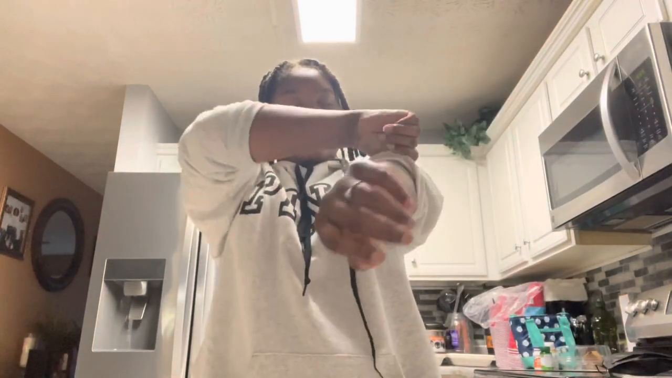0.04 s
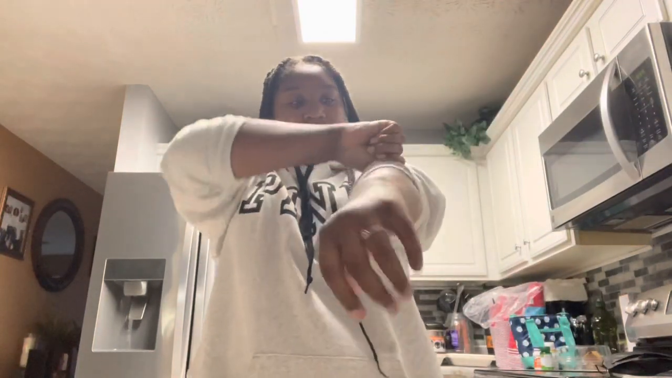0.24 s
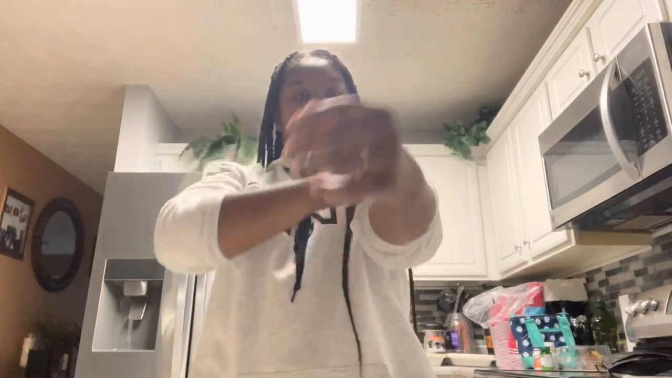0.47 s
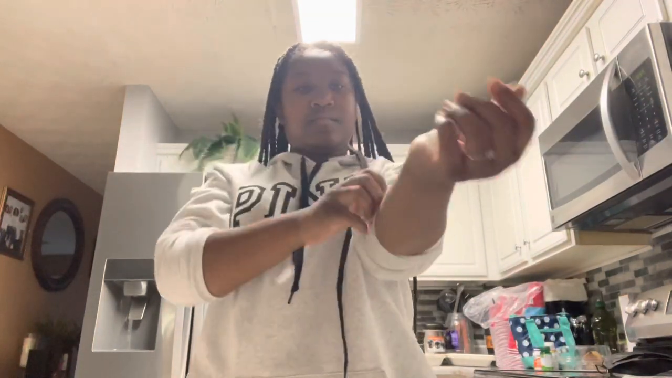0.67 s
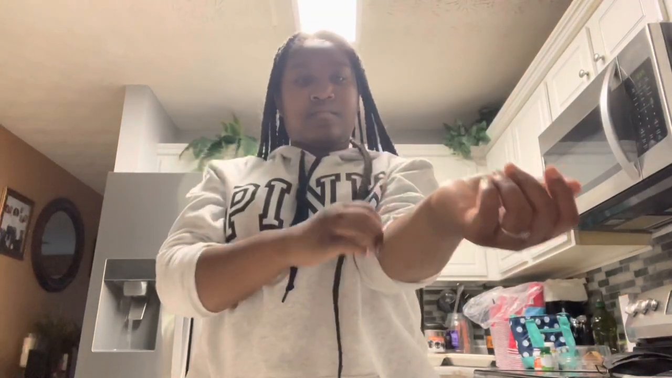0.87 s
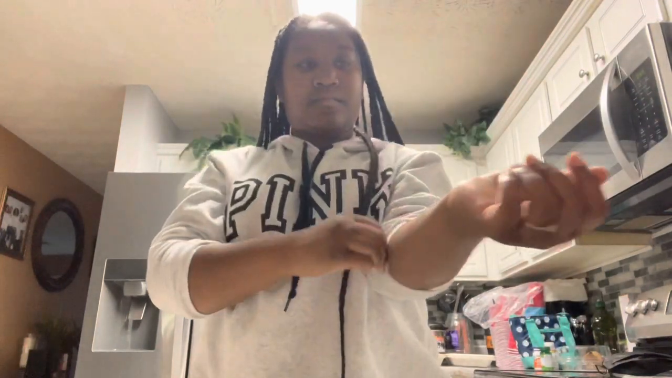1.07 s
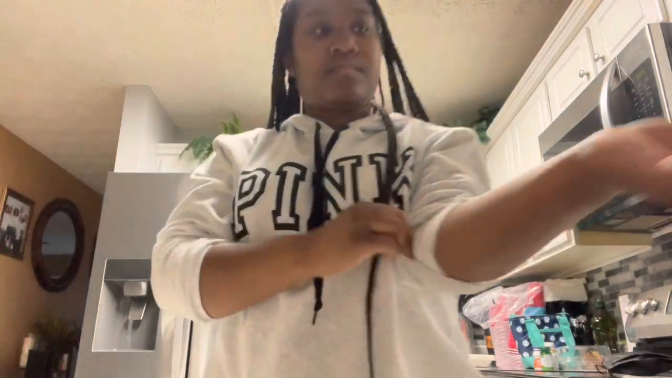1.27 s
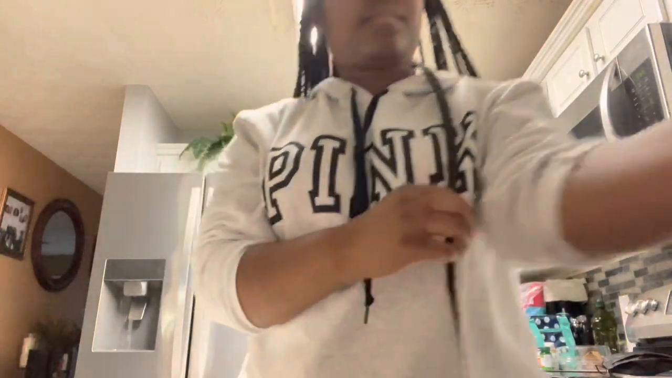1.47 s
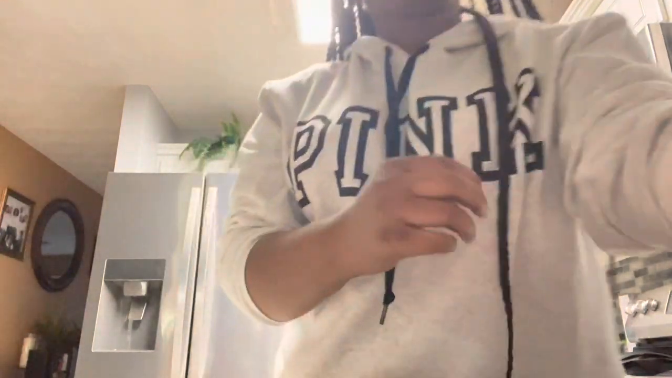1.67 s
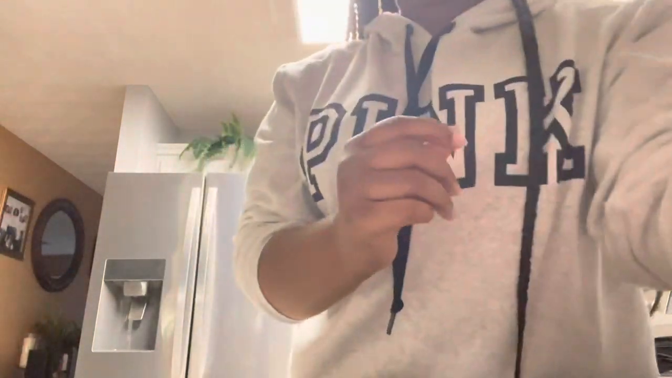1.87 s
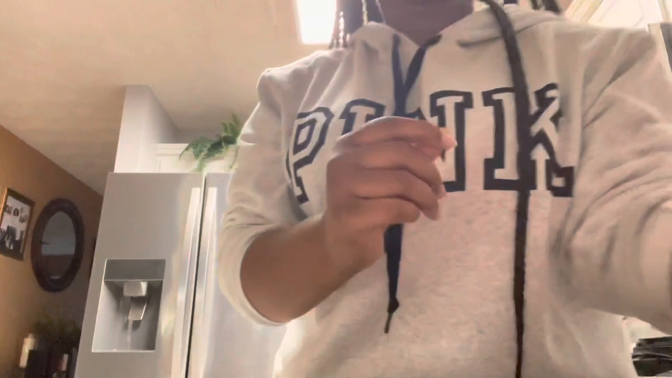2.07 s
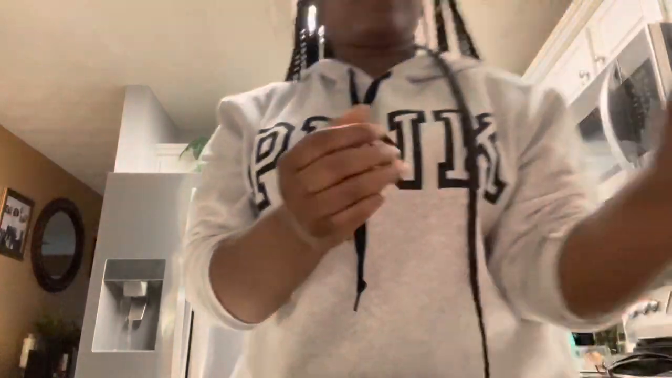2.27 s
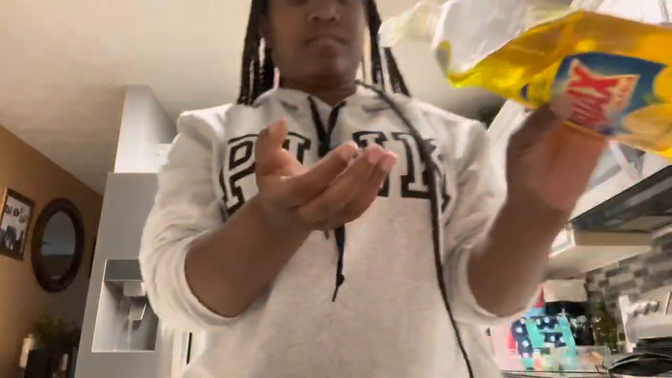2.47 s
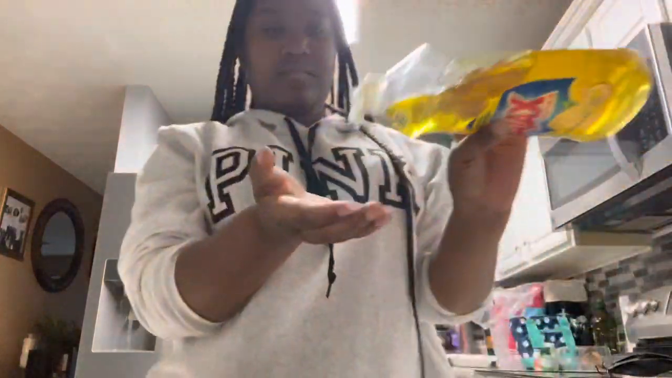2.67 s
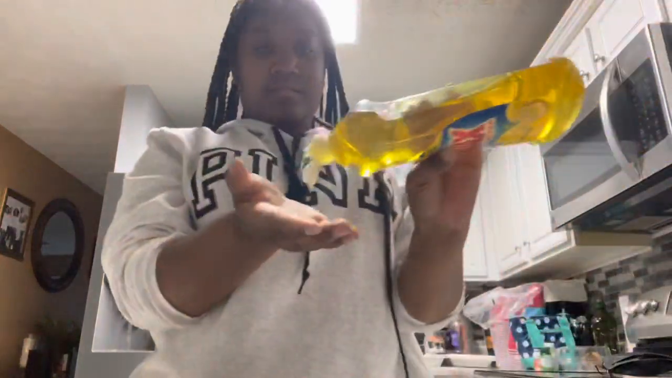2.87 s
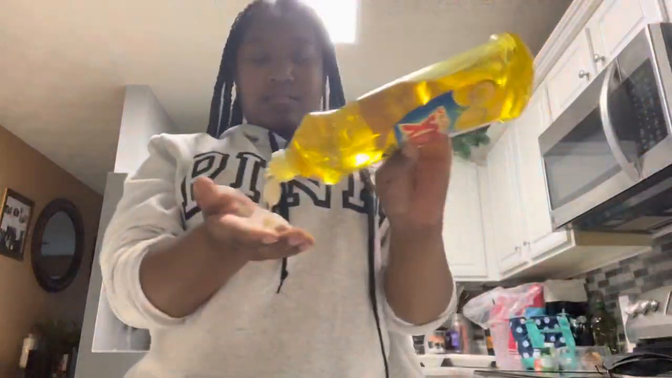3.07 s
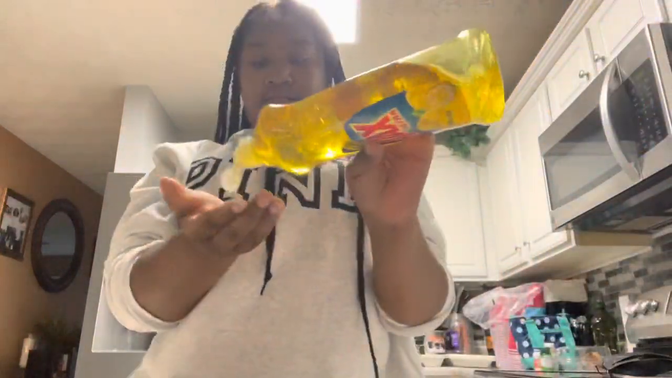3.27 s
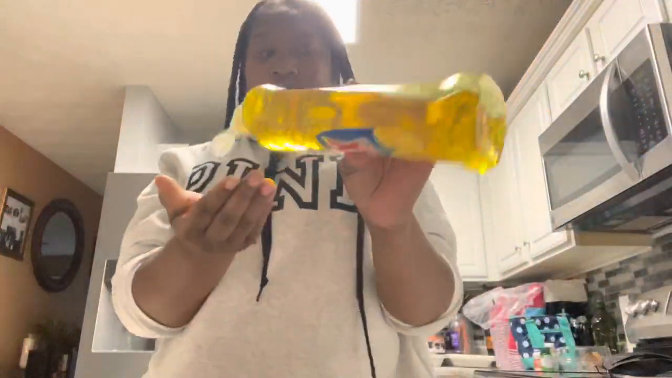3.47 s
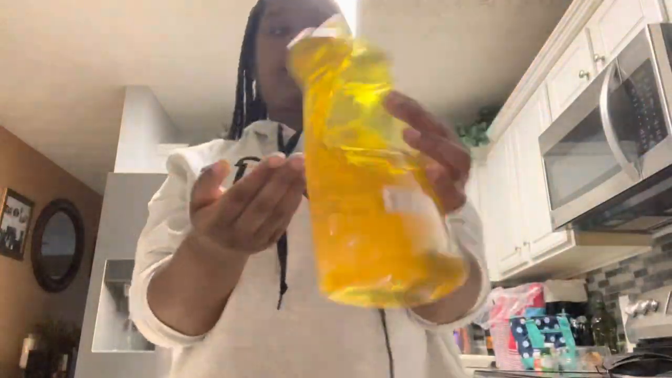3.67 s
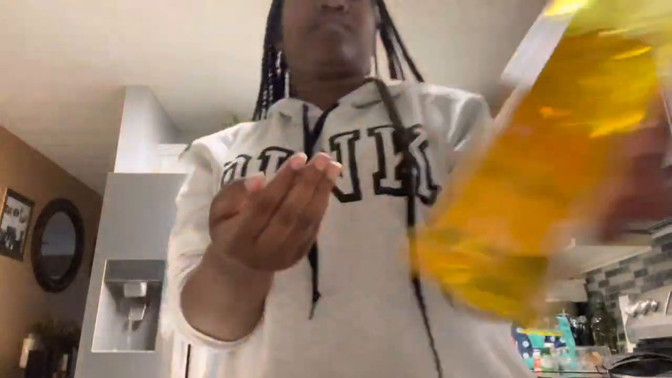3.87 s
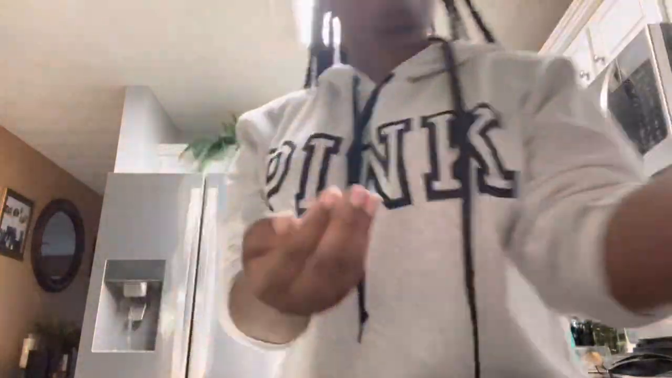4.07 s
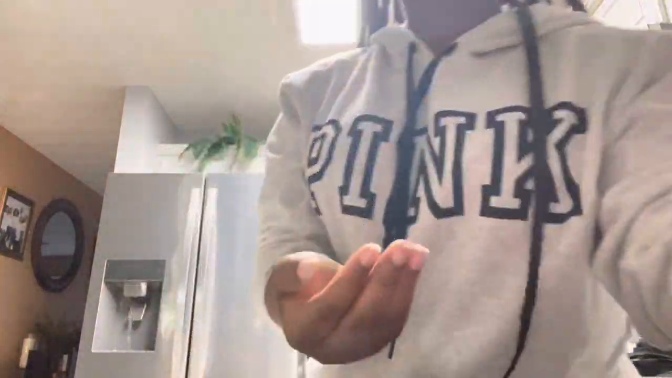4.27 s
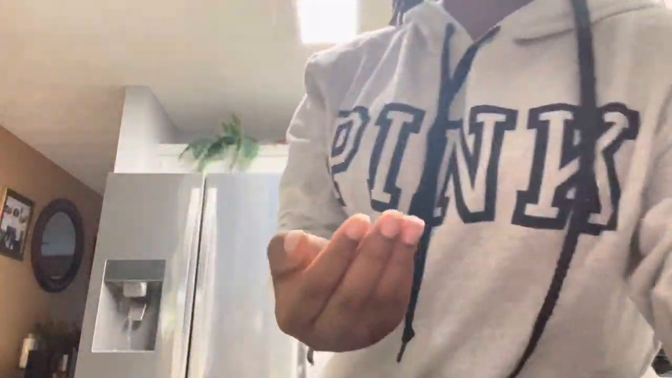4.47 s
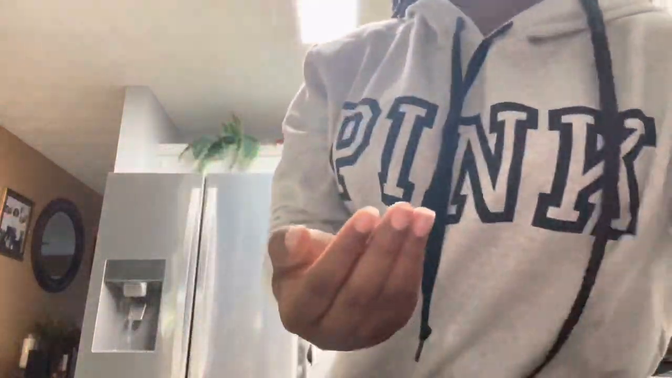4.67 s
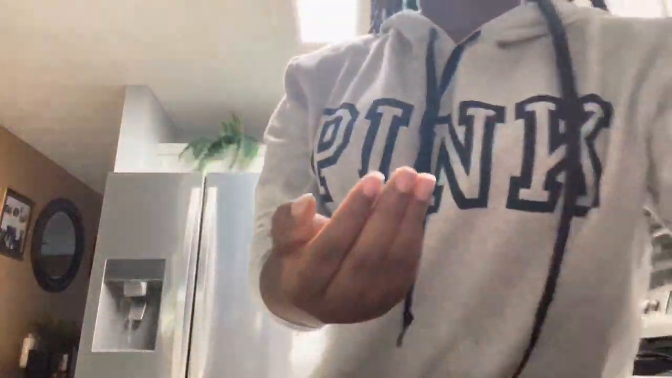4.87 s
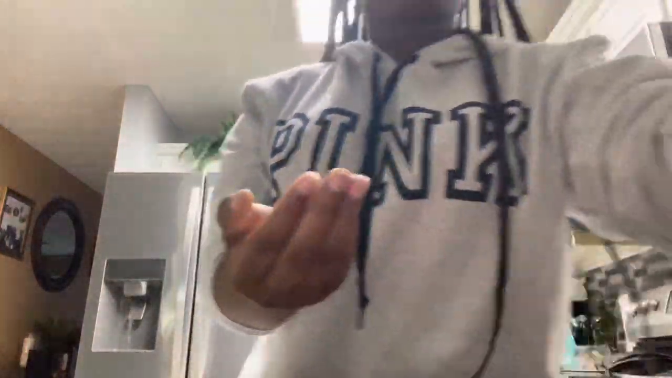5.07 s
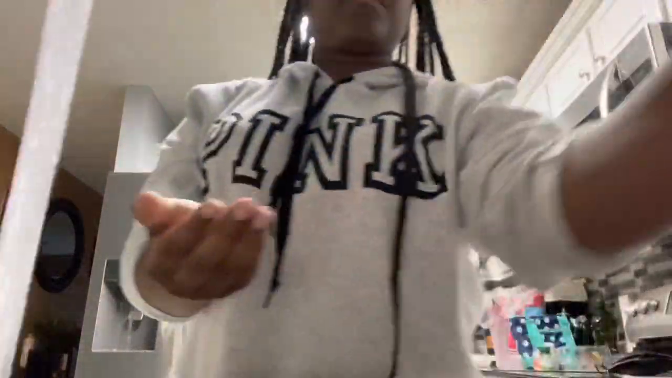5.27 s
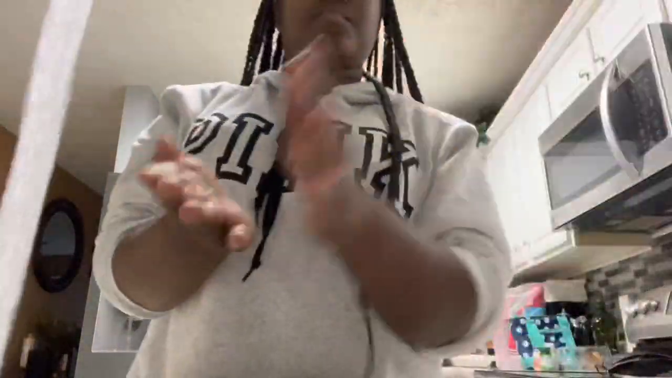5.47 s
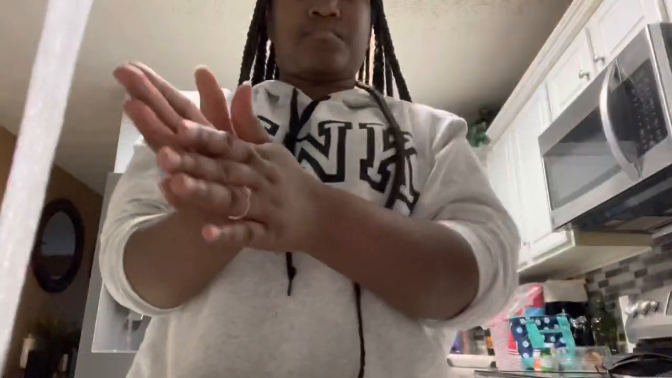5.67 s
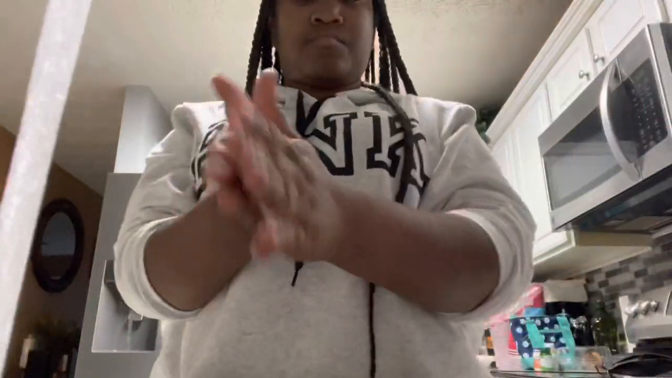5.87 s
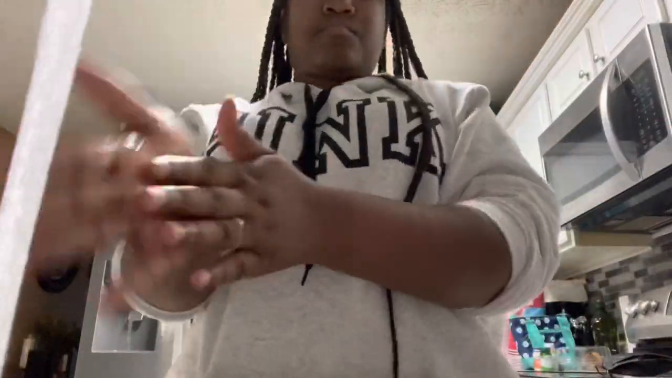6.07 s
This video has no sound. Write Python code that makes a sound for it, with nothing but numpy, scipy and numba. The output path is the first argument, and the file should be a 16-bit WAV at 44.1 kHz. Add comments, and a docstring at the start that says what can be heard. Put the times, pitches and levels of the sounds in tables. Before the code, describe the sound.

Heard from a phone lying on a kitchen counter, soft cloth slides over skin above a steady fridge hum. A plastic soap bottle clicks and bumps as it is handled, then lands on the counter with a loud, hollow knock and a few smaller ones. The tap opens, trapped air whistles out in three quick spurts, and water runs into the sink with a bright hiss, splatting drops and more knocks.

```python
"""First you hear a fridge humming in a quiet kitchen and the soft rustle of sleeves being pushed up.
A plastic soap bottle is lifted and set down with ticks and squeaks, and knocks make the counter ring.
Then the tap is opened: trapped air whistles out of the spout in three bursts, and a bubbly stream
hisses and splashes into the basin. It is all heard from a phone lying on the counter by the sink."""
import sys
import numpy as np
from scipy import signal
from scipy.fft import rfft, irfft, next_fast_len
from scipy.io import wavfile
from scipy.ndimage import uniform_filter1d
from numba import njit

SR = 44100
rng = np.random.default_rng(int(sys.argv[2]) if len(sys.argv) > 2 else 0)


def materialize(psi):
    """Save the field psi as 16-bit PCM at rate SR to the path in sys.argv[1].

    A 1-D psi becomes a single channel; in a 2-D psi each row is a channel.
    """
    bounded = np.clip(np.atleast_2d(psi).T, -1, 1)
    quanta = np.round(bounded * 32767).astype(np.int16)
    wavfile.write(sys.argv[1], SR, quanta)


N = 270333
T = np.arange(N) / SR

# How hard the water runs. Each row: time in seconds, level in dB, extra dB for splash and bubbles.
WATER_FLOW = [(4.97, -47, -3), (5.018, -59, 7.5), (5.076, -50.5, 13.5), (5.118, -42.5, 0), (5.15, -36, -6),
              (5.166, -40, 4), (5.186, -34.5, -9), (5.264, -36, -5), (5.322, -33, 0), (5.58, -30.5, -4),
              (6.13, -32.5, -4)]
# The tone of the jet and of its splash. Each row: frequency in Hz, level in dB.
JET_TONE = [(3000, -8.5), (5000, -4), (6300, -6), (7500, 4), (8300, 10.5), (10500, 4), (12500, 5),
            (14000, 14), (16000, -9)]
SPLASH_TONE = [(200, -39), (330, -11.5), (500, -0.5), (750, -7), (1100, -5.5), (1700, -4), (2100, -8.5),
               (4000, -4.5), (6000, -12), (9000, -36)]
# The notes the basin rings at. Each row: pitch in Hz, width in Hz, level in dB.
BASIN_NOTES = [(896, 20, -16), (1810, 55, -14.5), (6250, 430, -5.5), (7250, 500, -8)]
# The loudest drops. Each row: start in seconds, peak level in dB, pitch in Hz.
BIG_DROPS = [(5.346, -12.5, 10600), (5.406, -17.5, 6360), (5.4613, -14.5, 11100), (5.4944, -15, 10800),
             (5.6164, -17, 10900), (5.6486, -14, 6280), (5.6662, -18, 3840), (5.7934, -17, 6260),
             (5.8044, -10, 10500), (5.9097, -14.5, 6300), (6.0296, -17.5, 6040)]

def tap_stream():
    """A jet of water mixed with air hisses and rings the basin; bubbles fizz and drops splat."""
    times, level_db, splash_db = np.transpose(WATER_FLOW)
    fade_in = np.clip((T - times[0] + 0.035) / 0.029, 0, 1)
    flow = undb(np.interp(T, times, level_db)) * fade_in
    jet = patchy(hiss(JET_TONE), flicker_db=1.4, rate=60) * undb(4 + 0.58 * wander(40) + wander(250))
    splash = patchy(hiss(SPLASH_TONE), flicker_db=3.9, rate=35)
    splash *= undb(0.7 * wander(30) + 1.15 * wander(120))
    water = stereo_noise()
    jet += sum(undb(db + 2.1 * wander(30)) * unit(ring(water, hz, w)) for hz, w, db in BASIN_NOTES)
    bubbles, splats, t = np.zeros((2, N)), np.zeros((2, N)), T[:700]
    for when, pitch, size, pan in rng.random((700, 4)):
        hz = 1500 * 7 ** pitch
        pop = np.sin(2 * np.pi * hz * t * (1 + 30 * t)) * np.exp(-t * hz / 4)  # rises as it dies
        add(bubbles, 4.95 + 1.17 * when, pop * undb(17 * size ** 3) * sides(12 * pan - 6))
    small_drops = [(5.32 + (T[-1] - 5.32) * when, -22 + 6 * size, 6260 if pitch < 0.5 else 10000)
                   for when, size, pitch in rng.random((20, 3))]
    for start, db, hz in BIG_DROPS + small_drops:
        burst = rng.standard_normal((2, len(t))) * np.exp(-t / 0.0066) * (1 - np.exp(-t / 0.00041))
        splat = ring(burst, hz, 0.34 * hz)
        add(splats, start, undb(db) * splat / np.abs(splat).max())
    landing = undb(np.interp(T, times, splash_db)) * (splash + undb(-14.5) * bubbles)
    return flow * (jet + landing) + splats


def whistle(hz, width):
    """Rushing air makes an unsteady tone inside a puff of noise at the same pitch."""
    wobbly_hz = hz + 0.35 * width * wander(250)
    tone = np.sqrt(2) * np.sin(2 * np.pi * np.cumsum(wobbly_hz) / SR) * undb(wander(200))
    puff = np.array([unit(band_pass(rng.standard_normal(N), hz, 0.64 * width)) for _ in "LR"])
    return unit(tone + 0.88 * puff)


# One list per burst of air. Each row: time in seconds, whistle level in dB, whistle pitch in Hz,
# which pipe note is loudest (near 1, 2 or 3), pipe level in dB, spray level in dB.
AIR_BURSTS = [
    [(4.826, -66, 6320, 1, -66, -63), (4.848, -34, 6300, 1.54, -35, -30),
     (4.866, -24.5, 6550, 0.57, -22, -29.5), (4.878, -27, 6620, 1, -16, -35),
     (4.888, -10, 6480, 1, -23.5, -28), (4.897, -21, 6590, 1.06, -29, -25),
     (4.912, -16, 6480, 1.77, -28, -25), (4.93, -27, 7220, 1.96, -27, -22.5),
     (4.944, -32.5, 6690, 2, -41, -27), (4.975, -62, 6420, 1.8, -51, -49)],
    [(5.04, -70, 6470, 2, -75, -70), (5.048, -17.5, 6670, 2.3, -31.5, -32),
     (5.062, -37, 6610, 2.8, -26.5, -31), (5.068, -40, 6570, 0.87, -43, -41),
     (5.078, -23, 6455, 1.18, -23, -27), (5.09, -25.5, 7300, 2.6, -37, -32), (5.1, -54, 7020, 2, -58, -51)],
    [(5.152, -61, 6070, 2, -69, -50), (5.16, -21.5, 6200, 2.1, -44, -25), (5.172, -37, 6500, 3.5, -19, -31),
     (5.186, -63, 6120, 3, -58, -52)],
]
# The notes of the spout's pipe. Each row: pitch in Hz, width in Hz.
PIPE_NOTES = [(1900, 94.5), (3550, 149.3), (5250, 140)]
# The tone of the spray and of the gurgle. Each row: frequency in Hz, level in dB.
SPRAY_TONE = [(600, -30), (1500, -12), (2500, -13.5), (4300, -10), (5600, -6), (6600, -3), (8200, -1),
              (10300, -13), (12500, -14.5), (14500, -15.5), (16000, -37)]
GURGLE_TONE = [(700, -20), (1200, -1), (1650, 3), (2500, 11.5), (3000, -35), (4300, 4), (6000, -9)]

def spitting_spout():
    """Air sounds the pipe and whistles in the tap's nozzle, sliding in pitch with the pressure."""
    times, *curves = np.concatenate(AIR_BURSTS).T
    whistle_db, whistle_hz, loudest, pipe_db, spray_db = (np.interp(T, times, c) for c in curves)
    blowing = sum((T > burst[0][0]) & (T <= burst[-1][0]) for burst in AIR_BURSTS)
    gate = uniform_filter1d(blowing.astype(float), size=90)
    pipe = sum(undb(pipe_db - 21 * abs(loudest - note)) * whistle(hz * (1 + 0.016 * wander(40)), width)
               for note, (hz, width) in enumerate(PIPE_NOTES, 1))
    nozzle = undb(whistle_db) * whistle(whistle_hz, width=390)
    nozzle += undb(spray_db) * hiss(SPRAY_TONE) * undb(2 * wander(150))
    gurgle = undb(-33 + 0.66 * (pipe_db + 24.5)) * hiss(GURGLE_TONE) * undb(1.5 * wander(180))
    air = gate * ((pipe + gurgle) * sides(-1.9) + nozzle * sides(-8.5))
    return air + 0.65 * sum(ring(air, hz, width / 7) for hz, width in PIPE_NOTES)  # the metal rings on


# Knocks on the counter. Each row: start in seconds, level in dB, extra dB for deep, hollow, upper notes.
KNOCKS = [(1.272, -38, -18, -18, -28), (1.284, -43, -10, -18, -26), (1.456, -39, -5, -5, -1),
          (1.719, -38.5, 3.5, -2.5, -17), (1.745, -44, -9, -2, -18), (1.771, -27, -23, -13.5, -11.5),
          (1.805, -28.5, -31, -15, -32), (1.825, -29.5, -14, -13, -29), (1.838, -36, -10, -17, -28),
          (1.888, -36.5, -7, -16, -27), (2.447, -39, -24, -17, -21), (2.846, -32, -22, -11, -18),
          (3.57, -21, -28, -6, -10), (3.622, -28, -27, -17, -16), (3.907, -40, -21, -9, -6),
          (3.916, -30.5, -29, -2.5, -9), (3.935, -30, -21, -9, -2), (3.95, -36.5, -26, -12, -3),
          (4.304, -15.5, -12, -5.5, -14), (4.31, -4.5, -7, -13, -18.5), (4.333, -17, -13, -4, -10),
          (4.358, -16, -9, -11, -17), (4.398, -21, -6, -13, -13), (4.439, -21.5, -11, 7, -10),
          (4.466, -21.5, -10, -10.5, -15.5), (4.504, -21.5, -18, -15.5, -23),
          (4.594, -26.5, -11, -16.5, -24), (4.644, -26, -25, -22, -29), (4.765, -20.5, -10, -19.5, -36),
          (4.78, -24.5, -16.5, -31, -39), (4.86, -31, -11, -14, -22), (5.015, -29, -12, -19, -28),
          (5.058, -28.5, -9.5, -24, -29), (5.107, -29.5, -6, -21, -26), (5.159, -33, 2, -22, -23),
          (5.197, -32, -4, -23, -21), (5.293, -10, -16, -10.5, -22), (5.329, -20, -15, -5, -6),
          (5.345, -14, -32, -19.5, -20.5), (5.378, -26.5, -30, -11, -19), (5.44, -30, -15, -17, -17),
          (5.575, -29, -12, -14, -19), (5.837, -31.5, -17, -25, -22), (5.95, -32, -23, -18, -7)]
# The notes of counter and basin. Each row: pitch in Hz, level in dB, seconds to fade by 60 dB before
# damping, how far the left side typically runs ahead in radians.
COUNTER_NOTES = [(46.6, -10, 0.3, 12), (64.3, 5, 0.34, 0.27), (93.7, 4, 0.34, 0.9), (138, -3.5, 0.16, 0.9),
                 (158.9, 0.5, 0.19, 1.28), (186.7, 5, 0.1, 1.93), (219.3, -9, 0.25, 3), (315, 2, 0.13, 3.5),
                 (355, 8.5, 0.056, 3), (399.3, 5, 0.18, 3), (452.4, 0.5, 0.28, 2.5), (517.4, 3, 0.16, 3.5),
                 (606, -2, 0.19, 3.5), (747, -3, 0.28, 4), (854, -10.5, 0.17, -0.5), (999, 5, 0.048, 3.5)]

def counter_knocks():
    """Each soft knock rings the counter's notes in its own mix; hollow knocks die sooner."""
    out, t = np.zeros((2, N)), T[:SR // 2]
    hz, note_db, ring_s, lead = np.transpose(COUNTER_NOTES)[:, :, None]
    lean_db = -4 * (hz > 260)  # all but the low notes lean right
    for start, db, deep_db, hollow_db, upper_db in KNOCKS:
        vary_level, vary_pitch, vary_lead = rng.standard_normal((3, len(hz), 1))
        top_db = -9 + 0.54 * upper_db
        mix_db = np.select([hz < 115, hz < 260, hz < 480, hz < 680],
                           [deep_db, 0, hollow_db, upper_db], top_db)
        damping = 1.203 * np.exp(0.0664 * (hollow_db + 14.5))
        attack = 1 - np.exp(-t * hz / 0.85)
        level = attack * undb(note_db + mix_db + 0.65 * vary_level - 60 * damping * t / ring_s)
        phase = 2 * np.pi * hz * (1 + 0.024 * vary_pitch) * t
        shift = lead * (1 + 0.35 * vary_lead) / 2
        knock = np.array([(level * undb(side * lean_db / 2) * np.sin(phase + side * shift)).sum(0)
                          for side in (1, -1)])
        add(out, start, undb(db) * sides(0.95 + 2 * vary_level[0, 0]) * knock)
    return out


# Ticks of bottle, cap and tap lever. Each row: start in seconds, body level in dB, main pitch in Hz,
# then the middle and the bright part in dB compared with the body.
TICKS = [(1.353, -50.5, 1800, 7, -7), (1.439, -46, 1760, -16, -3), (1.455, -30.5, 1810, -13, -14.5),
         (1.46, -42, 902, -11, -21), (1.707, -49, 961, -21, -26), (1.766, -26.5, 2280, -3, -25),
         (1.776, -29.5, 1460, -14, -34), (1.786, -31.5, 1160, -16, -38), (1.895, -52, 1110, -6, -9),
         (2.843, -43, 1210, -32, -36), (3.275, -54, 902, -26, -33), (3.566, -38.5, 945, -25, -37),
         (3.615, -36, 1780, -30, -31), (3.622, -28, 1200, -16, -29), (3.912, -45, 1380, -10, -16),
         (3.949, -42, 918, -13, 5), (3.963, -44, 955, -21, -21), (4.303, -23, 1930, -22, -39),
         (4.31, -12.5, 910, -14.5, -16), (4.38, -30.5, 974, -10, -21), (4.44, -24, 1340, -16, -35),
         (4.484, -33, 945, -30, -42), (4.511, -41, 947, -29, -39), (4.586, -40.5, 1090, -32, -34),
         (4.757, -42, 939, -11, -13), (4.83, -28, 1750, 3.5, -30)]
# The notes of the plastic body and of the thin cap. Each row: pitch in Hz, width in Hz.
PLASTIC_NOTES = [(950, 102), (1200, 250), (1500, 104), (1850, 230), (2250, 200), (2700, 290), (3300, 270),
                 (4100, 230)]
CAP_NOTES = [(4950, 86), (5900, 1100)]

def bottle_ticks():
    """A snap and its rattle ring the plastic's notes nearest the tick's pitch; treble dies faster."""
    out, t = np.zeros((2, N)), T[:SR // 4]
    for start, db, main_hz, middle_db, bright_db in TICKS:
        ring_s = 0.071 * (main_hz / 1000) ** -0.24
        pan_db = -6.5 + 4 * np.log2(main_hz / 1000)  # low ticks sit further right
        snap, rattle = 3.3 * np.exp(-t / 0.0013), undb(-60 * t / ring_s)
        crack = rng.standard_normal((2, len(t))) * (snap + rattle) * (1 - np.exp(-t / 0.00066))
        crack[1] = 0.5 * np.roll(crack[0], 3) + 1.22 * crack[1]  # the right gets some of the left, late
        body = sum(undb(-14 * abs(np.log2(hz / main_hz))) * ring(ring(crack, hz, 3 * width), hz, width)
                   for hz, width in PLASTIC_NOTES)
        _, middle, bright = three_bands(crack * undb(-15 * t / ring_s))
        middle += 5 * sum(ring(crack, hz, width) for hz, width in CAP_NOTES)
        parts = (body, 0), (middle, middle_db), (ring(bright, 6100, 6000), bright_db)
        tick = sum(undb(part_db) * part / np.abs(part).max() for part, part_db in parts)
        add(out, start, sides(pan_db) * undb(db) * tick)
    return out


# Each row: start in seconds, starting pitch in Hz, length in seconds, level in dB.
SQUEAKS_AND_RINGS = [(1.14, 1850, 0.034, -52), (1.286, 2440, 0.021, -53), (3.568, 5700, .021, -64),
                     (3.569, 3060, .016, -59), (3.617, 1830, 0.016, -39.5), (3.622, 5800, 0.022, -55),
                     (3.623, 4900, 0.025, -58), (3.938, 5550, .011, -50), (3.948, 3180, .018, -54),
                     (3.956, 1930, .013, -47), (4.171, 4420, .01, -49), (4.177, 4600, .009, -53),
                     (4.178, 5300, 0.014, -55), (4.194, 3900, .012, -50), (4.204, 4400, .008, -57),
                     (4.76, 5070, .045, -64)]

def squeaks_and_rings():
    """Short squeaks of skin and wet plastic, and brief rings of the cap, rising slightly, on the right."""
    out, roughness = np.zeros((2, N)), wander(400)
    for start, start_hz, length, db in SQUEAKS_AND_RINGS:
        n = int(length * SR)
        glide = np.linspace(start_hz, start_hz + 1.1 / length, n)
        hz = glide * (1 + 0.024 * roughness[int(start * SR):][:n])
        tone = np.hanning(n) * np.sin(2 * np.pi * np.cumsum(hz) / SR)
        add(out, start, undb(db) * sides(-3.2) * tone)
    return out


# Sleeve strokes. Each row: start in seconds, level in dB, rough length in seconds, brightness
# (higher means more treble and less body).
STROKES = [(0.02, -75, 0.25, -2), (0.113, -62, 0.03, -5), (0.236, -66.5, 0.12, -2), (0.397, -65, 0.12, -6),
           (0.58, -72, 0.14, -12), (0.7, -75, 0.43, -17), (0.872, -67, 0.073, 7), (1.0, -77, 0.22, -4),
           (1.112, -63, 0.084, -2.5), (1.14, -71, 0.053, 2), (1.266, -62.5, 0.09, -13),
           (1.71, -67, 0.15, -16), (1.785, -66, 0.066, -25), (2.12, -71.5, 0.19, -10),
           (2.25, -88, 0.23, -6), (2.75, -79, 0.27, -20), (3.4, -72.5, 0.15, -21), (3.52, -76, 0.15, -18),
           (3.623, -61, .04, -13), (3.914, -53.5, 0.048, 4), (3.942, -60.5, 0.04, -19),
           (4.05, -74.5, 0.13, -9), (4.173, -69, 0.24, -15), (4.3034, -37.5, 0.036, -22),
           (4.3435, -57, 0.1, -26), (4.4413, -69.5, .05, -22), (4.4844, -72, 0.26, -13),
           (4.753, -62, 0.057, -10)]
# The tone of the cloth. Each row: frequency in Hz, level in dB.
CLOTH_TONE = [(700, 10), (1450, 5), (1850, 8.5), (2100, 2.5), (2600, -0.5), (3400, -9), (6000, -19),
              (8300, -10.5), (10300, -18.5), (12700, -18), (14200, -23), (15600, -31)]

def sleeves():
    """Cloth slides over skin: countless tiny fibre clicks swell and fade with each stroke."""
    fibres = rng.standard_normal((2, N)) * undb(2 * rng.exponential(size=(2, N)))
    dull, middle, bright = map(unit, three_bands(colour(fibres, CLOTH_TONE)))
    out = np.zeros((2, N))
    for start, db, length, brightness in STROKES:
        rise, fall = 0.37 * length, 0.63 * length
        swell = np.sin(np.pi / 2 * np.clip((T - start) / rise + 0.5, 0, 1)) ** 2
        fade = np.exp(-np.maximum(T - start - rise, 0) / fall)
        rustle = undb(4.5 - 0.43 * brightness) * dull + middle + undb(0.68 * brightness) * bright
        out += undb(db) * swell * fade * rustle
    return out * sides(-2.5) * undb(0.79 * wander(60))


# The tone of the kitchen air. Each row: frequency in Hz, level in dB.
AIR_TONE = [(15, -81), (25, -71), (49, -9.5), (87, -12), (102, -16.5), (123, -13), (149, -17), (190, -15),
            (416, -19.5), (840, -25), (1100, -35.5), (2350, -42), (16000, -69.5)]

def fridge_and_air():
    """The fridge hums, wavering a little, over room air and the rumble of a distant motor."""
    hum = np.sqrt(2) * np.sin(2 * np.pi * 120.5 * T + 0.28 * wander(2.43))
    hum *= undb(-43 + 0.2 * wander(10))
    air = undb(-46.5 + 0.69 * wander(3.2)) * hiss(AIR_TONE)
    return air + hum * sides(0.31)


def room_echo(x, ring_s):
    """The walls send sound back as a dense, fading echo."""
    t = T[:SR // 2]
    walls = rng.standard_normal((2, len(t))) * undb(-60 * t / ring_s) * (t > 0.004)
    walls /= np.sqrt((walls ** 2).sum(1, keepdims=True))
    return signal.fftconvolve(x.mean(0, keepdims=True), walls, axes=1)[:, :N]


# How alike left and right are. Each row: frequency in Hz, likeness from -1 (opposite) to 1 (the same).
LIKENESS = [(60, 0.89), (130, 0.44), (290, 0.39), (640, -0.7), (1410, -0.02), (3100, -0.23), (6820, 0.19),
            (15000, 0.61)]

def stereo_noise():
    """Noise from all around reaches the two microphones partly alike."""
    mid, side = rfft(rng.standard_normal((2, N)))
    likeness = curve(LIKENESS)
    mid *= np.sqrt((1 + likeness) / 2)
    side *= np.sqrt((1 - likeness) / 2)
    return irfft(np.array([mid + side, mid - side]), N)


def curve(table):
    """Joins a table's points to give a value at every frequency."""
    hz, values = np.transpose(table)
    all_hz = np.maximum(np.arange(N // 2 + 1) * SR / N, 1)
    return np.interp(np.log(all_hz), np.log(hz), values)


def colour(x, tone):
    """Filters a sound by a tone table, at strength 1."""
    return unit(irfft(rfft(x) * undb(curve(tone)), N))


def hiss(tone):
    """Stereo noise with the given tone."""
    return colour(stereo_noise(), tone)


def patchy(x, flicker_db, rate):
    """Makes each half-octave flicker on its own."""
    centres = 250 * 2 ** np.arange(0, 6.1, 0.5)
    return unit(sum(ring(x, hz, hz / 3) * undb(flicker_db * wander(rate)) for hz in centres))


def wander(rate):
    """A smooth random wobble of size about 1, with `rate` new values a second."""
    hold = int(SR / rate)
    steps = np.repeat(rng.standard_normal(N // hold + 1), hold)
    return unit(uniform_filter1d(uniform_filter1d(steps, hold), hold)[:N])


@njit
def band_pass(x, hz, width):
    """Lets through the sound near a pitch that can move."""
    out, band, low = np.empty(len(x)), 0., 0.
    for i in range(len(x)):
        step, damping = np.tan(np.pi * hz[i] / SR), width / hz[i]
        swing = (band + step * (x[i] - low)) / (1 + step * (step + damping))
        band, low = 2 * swing - band, low + 2 * step * swing
        out[i] = damping * swing
    return out


def ring(x, hz, width):
    """Rings both sides at one pitch; a narrower width rings longer."""
    return np.array([band_pass(side, np.full(len(side), float(hz)), float(width)) for side in x])


def three_bands(x):
    """The parts below 3500 Hz, from there to 8000 Hz, and above."""
    low, most = (signal.sosfiltfilt(signal.butter(3, hz, fs=SR, output="sos"), x) for hz in (3500, 8000))
    return low, most - low, x - most


def undb(db):
    """Turns dB into a multiplier."""
    return 10 ** (np.asarray(db) / 20)


def unit(x):
    """Scales to an average strength (rms) of 1."""
    return x / np.sqrt(np.mean(x ** 2))


def sides(pan_db):
    """Left and right multipliers; plus leans left, minus leans right."""
    return undb(np.array([[pan_db / 2], [-pan_db / 2]]))


def add(out, start, x):
    """Mixes x in at a start time in seconds."""
    i = int(start * SR)
    out[:, i:i + x.shape[-1]] += x[..., :N - i]


def scene():
    """The small nearby sounds get a faint echo; knocks, water and fridge join them."""
    near = sleeves() + bottle_ticks() + squeaks_and_rings() + spitting_spout()
    echo = undb(-24) * room_echo(near, ring_s=0.39)
    return near + echo + counter_knocks() + tap_stream() + fridge_and_air()


def record(dry):
    """The phone's two microphones ripple the treble; loud peaks are rounded and the very top is cut."""
    in_step_hz, ripple_hz, top_hz = 10400, 4750, 15950
    size = next_fast_len(N + SR // 4)
    hz = np.arange(size // 2 + 1) * SR / size
    turn = np.pi * (hz - in_step_hz) / ripple_hz
    depth = np.clip((hz - 6000) / (9300 - 6000), 0, 1)  # the ripple fades in over this range in Hz
    mid, side = rfft(dry[0] + dry[1], size) / 2, rfft(dry[0] - dry[1], size) / 2
    leak = 0.6 * depth  # the shared sound leaks into the side signal, a quarter cycle off
    side = np.sqrt(1 - leak ** 2) * side - 1j * leak * np.sign(np.sin(2 * turn)) * mid
    mid *= 1 - depth + depth * np.sqrt(2) * np.abs(np.cos(turn)) ** 1.5
    side *= 1 - depth + depth * np.sqrt(2) * np.abs(np.sin(turn)) ** 1.5
    rounded = np.tanh(irfft(np.array([mid + side, mid - side]), size)[:, :N])
    return signal.sosfilt(signal.ellip(10, 0.2, 80, top_hz, fs=SR, output="sos"), rounded)


dry = scene()
out = record(dry)
materialize(out)
```